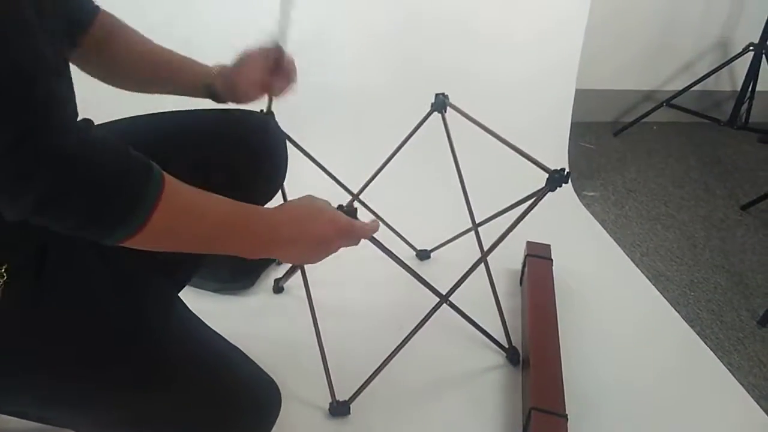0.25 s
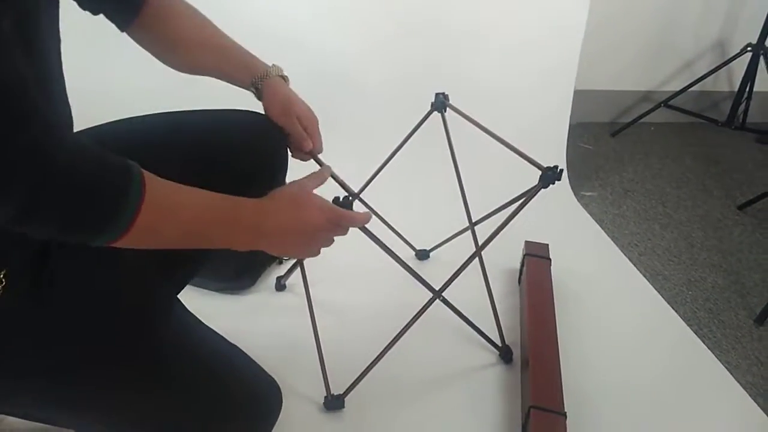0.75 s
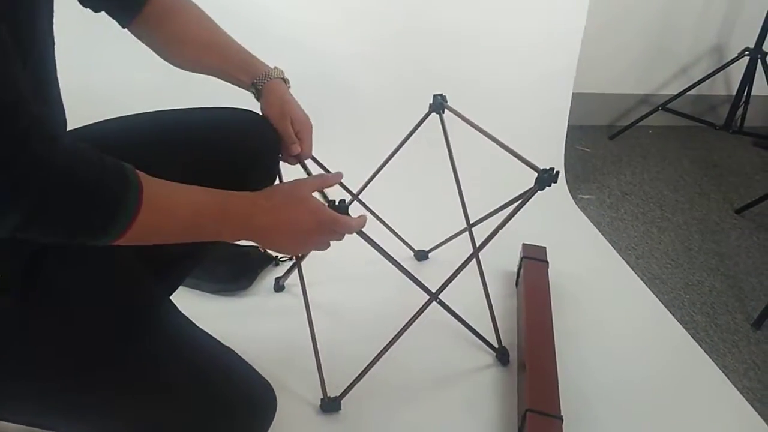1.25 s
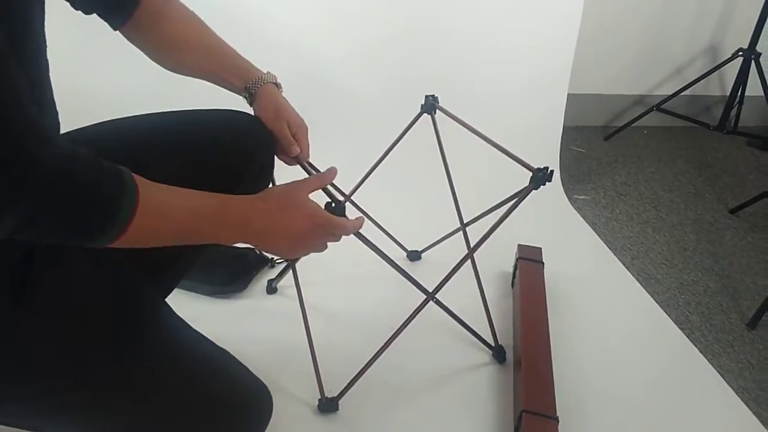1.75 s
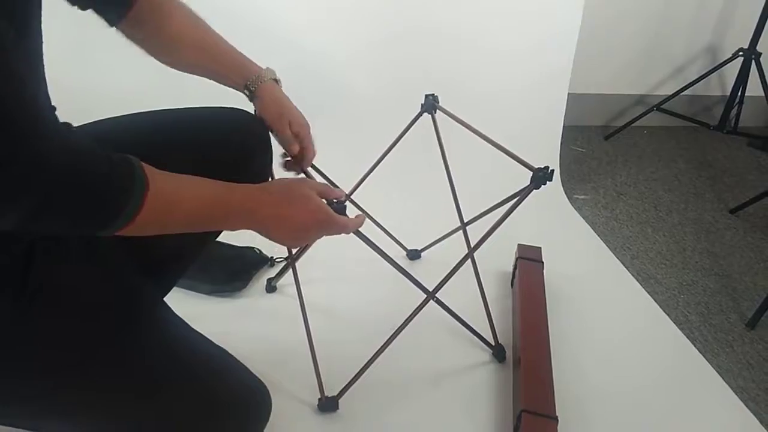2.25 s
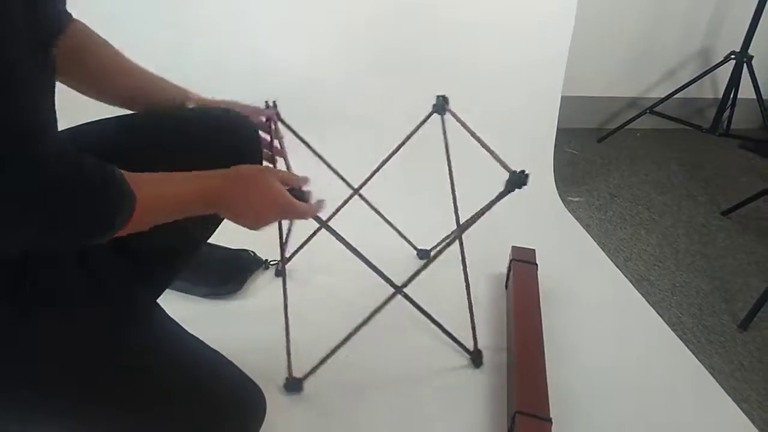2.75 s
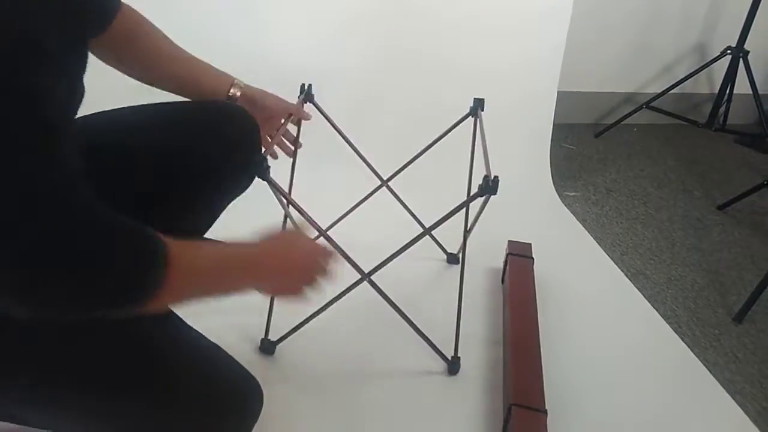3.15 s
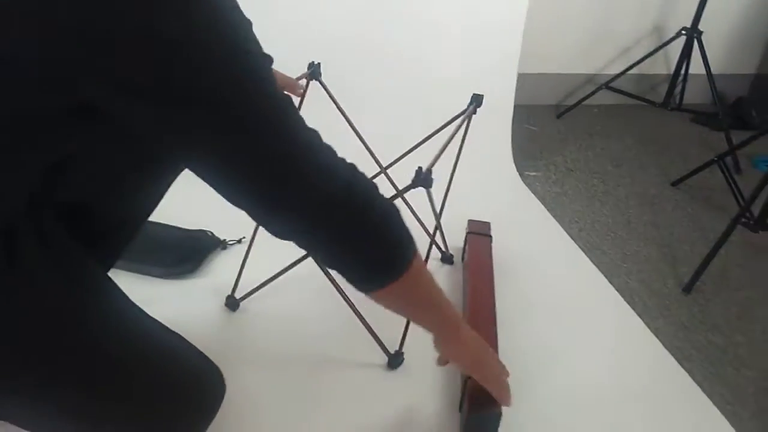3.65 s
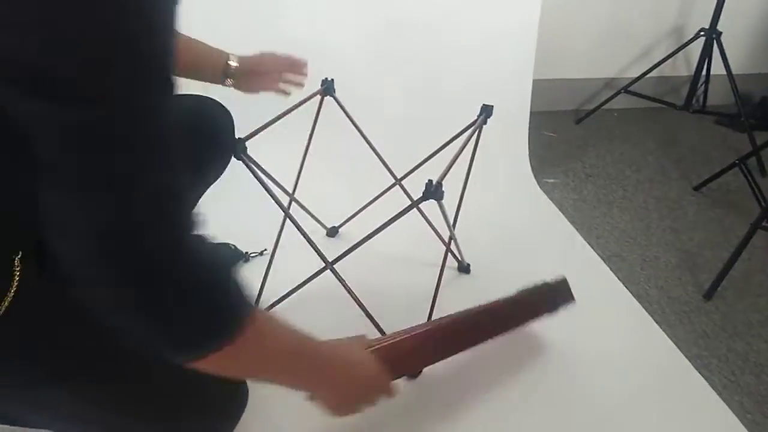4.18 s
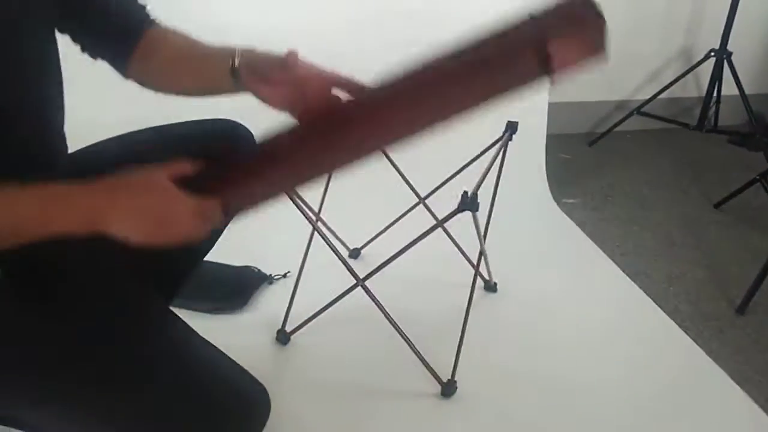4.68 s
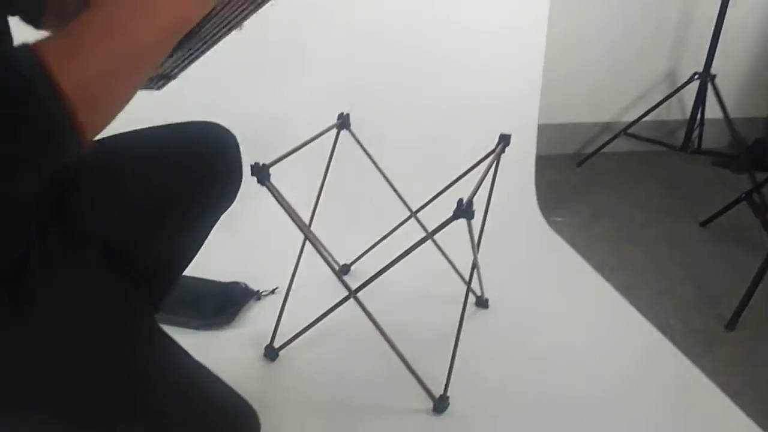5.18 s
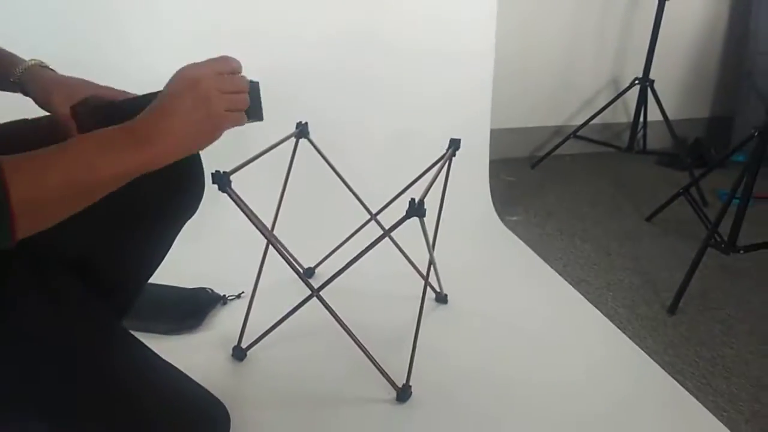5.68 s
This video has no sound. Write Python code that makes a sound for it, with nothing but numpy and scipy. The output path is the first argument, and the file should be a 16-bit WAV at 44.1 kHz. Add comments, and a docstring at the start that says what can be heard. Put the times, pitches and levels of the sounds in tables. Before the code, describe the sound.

A folding table frame is knocked together with dry clicks and a papery scrape, followed by a lifted slat bundle clattering sharply at the end.

```python
"""A small, bare studio with a paper backdrop: a folding camp table is set up before the microphone.
Aluminium poles click into plastic joints and seat with a duller blow: damped noise bursts, ringing modes.
A bundle of slats claps together as resonant bursts and chinks against a metal watch strap.
Feet slide on paper, a pole is eased home, the bundle squeaks, cloth and parts rub: filtered friction noise.
All of it feeds a diffuse room decay, over a steady background of low rumble and microphone hiss."""
import sys
import numpy as np
from scipy import signal
from scipy.fft import rfft, irfft
from scipy.io import wavfile

SR = 44100
rng = np.random.default_rng(int(sys.argv[2]) if len(sys.argv) > 2 else 0)


def dump_mix(stems):
    """Bounce the given channels to the path in sys.argv[1] as a 16-bit WAV at rate SR."""
    frames = np.atleast_2d(stems).T  # one column per channel
    limited = np.clip(frames, -1, 1)  # hard clip at full scale
    pcm = np.round(limited * 32767).astype(np.int16)
    wavfile.write(sys.argv[1], SR, pcm)


N = 261072
TIME = np.arange(N) / SR

# poles clicking into joints (levels before the body resonances):
# start_s [s], level_db [dB], hardness [0-1], thud_pitch_hz [Hz], seating_delay_s [s]
POLE_KNOCKS = [(0.0692, -24.5, 0.11, 271, .014), (.0722, -22.5, 0.48, 700, .021),
               (0.254, -42, 0.7, 300, .012), (0.6139, -33, 0.56, 860, .006), (.712, -48, 0, 646, .015),
               (1.161, -43, 0.28, 706, .011), (1.277, -42, 0.57, 745, .015),
               (1.390, -44.5, 0.63, 590, .021), (1.8492, -33, 0.63, 660, .008),
               (2.0141, -30.5, 0.81, 620, .015), (2.0283, -30, 0.07, 555, .009),
               (2.037, -38.5, 0.87, 530, .012), (2.592, -40.5, 0.4, 600, .028),
               (2.9428, -39.5, 0.86, 1130, .023), (2.967, -41.5, 0.59, 700, .012),
               (3.002, -37, 0.4, 850, .006), (3.2143, -28, 0.79, 358, .013)]
# resonances of the jointed frame: pitch_hz [Hz], width_hz [Hz], level_db [dB]
FRAME_RESONANCES = [(145, 40, 3), (240, 50, 6), (425, 30, -1), (520, 55, 6), (725, 30, 3), (870, 80, 3),
                    (1350, 200, -4), (2000, 300, -1), (3800, 1200, -4), (9900, 1500, -2)]
# touches on a loose pole end: start_s [s], level_db [dB]
LOOSE_POLE_TAPS = [(.073, -41), (.534, -58), (.546, -56.5), (1.850, -50)]
# ringing modes of a pole: pitch_hz [Hz], level_db [dB], t60_s [s]
POLE_MODES = [(2013, -13, .4), (3600, -17, .4), (7150, -9, .2), (7290, -9, .3), (9340, 0, .16),
              (9760, -6, .25), (11700, -2, .27), (11970, -9, .26), (14280, -7, .26)]
# the seating blow is weaker and softer than the click
SEAT_LOSS_DB, SEAT_HARDNESS_SHARE = 4.5, 0.64


def frame():
    """Poles click into plastic joints, seat with a softer blow, and ring while an end is still free."""
    contacts = []
    for start_s, level_db, hardness, thud_hz, delay_s in POLE_KNOCKS:
        click = (start_s, level_db, hardness, thud_hz)
        seating = (start_s + delay_s, level_db - SEAT_LOSS_DB, hardness * SEAT_HARDNESS_SHARE, thud_hz)
        contacts += [click, seating]
    knocks = blows(contacts, clack_hz=1184, snap_hz=4250, clack_t60=0.11, thud_t60=0.048, snap_t60=0.053)
    body = from_db(-4) * knocks + from_db(-3) * resonate(knocks, FRAME_RESONANCES)
    ringing = struck(LOOSE_POLE_TAPS, POLE_MODES, rebound_db=-18, tick_db=10)
    return body + ringing


# slats knocking in their bundle, plus one hard contact of the watch strap at 4.668 s (levels before the body):
# # start_s [s], level_db [dB], hardness [0-1], thud_pitch_hz [Hz]
BUNDLE_KNOCKS = [(3.778, -36, 0.1, 905), (3.789, -32.5, 0.28, 970), (4.2445, -33.5, 0.2, 1240),
                 (4.282, -37.5, .3, 1380), (4.336, -38.5, 0, 453), (4.603, -38.5, 0.26, 258),
                 (4.668, -38, 0.89, 496), (5.240, -38, 0.29, 490), (5.701, -38.5, 0.2, 630),
                 (5.7535, -25.5, 0.27, 1250), (5.7644, -21, 0.47, 510), (5.7835, -18, .58, 1200),
                 (5.8305, -22, 1, 410), (5.8354, -13, 0.92, 1010), (5.875, -31, 0.84, 705)]
# resonances of the bundle: pitch_hz [Hz], width_hz [Hz], level_db [dB]
BUNDLE_RESONANCES = [(298, 6.7, 7), (473, 10, 8), (4110, 1540, 2), (6300, 720, 0.5)]


def slats():
    """Hollow slats clap against each other; each blow also excites the bundle's resonances."""
    knocks = blows(BUNDLE_KNOCKS, clack_hz=1500, snap_hz=4570,
                   clack_t60=0.05, thud_t60=0.071, snap_t60=0.029)
    return from_db(-4.0) * (knocks + resonate(knocks, BUNDLE_RESONANCES))


# chinks of the watch strap: start_s [s], level_db [dB]
STRAP_CHINKS = [(4.524, -45), (4.630, -33), (4.682, -34), (4.780, -29.5), (4.801, -20), (4.823, -29.5),
                (4.830, -53), (4.841, -31)]
# ringing modes of its metal links: pitch_hz [Hz], level_db [dB], t60_s [s]
LINK_MODES = [(2830, -17, .05), (2930, -27, .45), (7240, -15, .06), (7315, -23, .33), (10440, -7, .06),
              (10558, -15, .36), (10610, -1, .06), (10800, -20, .3), (12650, -24, .14), (14060, -20, .13),
              (14590, -21, .12)]


def watch_strap():
    """Metal links ring at fixed pitches after each chink and its rebound."""
    return struck(STRAP_CHINKS, LINK_MODES, rebound_db=-8, tick_db=-16)


# resonances of the pole's tube under friction: pitch_hz [Hz], width_hz [Hz], level_db [dB]
TUBE_RESONANCES = [(1787, 22, 0), (3531, 35, -11)]
# colour of the feet sliding on paper: pitch_hz [Hz], level_db [dB]
PAPER_COLOUR = [(400, -52), (1200, -10.5), (2200, -2.5), (4500, 0.5), (8000, 0), (10000, 7), (13200, 2.5),
                (15500, -9)]
# resonances of the squeak: pitch_hz [Hz], width_hz [Hz], level_db [dB]
SQUEAK_RESONANCES = [(2250, 380, -5.5), (3880, 240, 4), (4070, 140, -6)]
# drags of the bundle's end: peak_s [s], level_db [dB], rise_s [s], fall_s [s]
BUNDLE_DRAGS = [(3.912, -49.5, .018, .07), (3.98, -49.5, .04, .04)]
# a pole is eased into its socket; start of full pressure
EASE_S, EASE_DB, EASE_RISE_S, EASE_HOLD_S, EASE_FALL_S = .85, -66, .13, .14, .26
# the feet slide in one pull; start of full speed
SLIDE_S, SLIDE_DB, SLIDE_RISE_S, SLIDE_HOLD_S, SLIDE_FALL_S = 2.753, -42.5, 0.14, .22, 0.12


def scrapes():
    """Friction sings in a pole's tube, hisses under the feet, and squeaks as the bundle drags on the floor."""
    tube = rms_one(resonate(friction(800, grain=0.5, flutter_db=1.5), TUBE_RESONANCES))
    paper = coloured(friction(2600, grain=0.31, flutter_db=3), PAPER_COLOUR)
    squeak = rms_one(resonate(friction(250, grain=0.2, flutter_db=-1.0), SQUEAK_RESONANCES))
    easing = stroke(EASE_S, EASE_DB, EASE_RISE_S, EASE_FALL_S, EASE_HOLD_S)
    sliding = stroke(SLIDE_S, SLIDE_DB, SLIDE_RISE_S, SLIDE_FALL_S, SLIDE_HOLD_S)
    return easing * tube + sliding * paper + strokes(BUNDLE_DRAGS) * squeak


# dull rubbing and sliding of cloth, pole and slats: peak_s [s], level_db [dB], rise_s [s], fall_s [s]
DULL_RUBS = [(.1, -54, 0.78, 0.85), (2.02, -51, 0.087, 0.34), (3.0, -61, 0.59, 1.9),
             (4.09, -51.5, 0.37, .35), (4.37, -49, 0.12, 0.63), (4.92, -58.5, 0.13, .7),
             (5.85, -46, 0.19, .3)]
# bright swishes, scrapes and faint hiss: peak_s [s], level_db [dB], rise_s [s], fall_s [s]
BRIGHT_SWISHES = [(.25, -60.5, 0.27, 0.54), (.81, -66.5, 0.039, 0.23), (1.345, -56, 0.069, 0.056),
                  (1.77, -60.5, 0.055, 0.13), (2.03, -56, 0.048, 0.28), (3.56, -46.5, 0.29, 0.24),
                  (3.83, -52.5, 0.15, 0.43), (4.45, -53.5, 0.37, 0.79), (4.915, -43.5, 0.022, 0.042),
                  (5.25, -78.5, 0.82, 2.6)]
# colour of the dull rubbing: pitch_hz [Hz], level_db [dB]
DULL_COLOUR = [(50, -21), (130, -1.5), (230, 0.5), (600, -2.5), (1000, -5), (2500, -10), (4600, -18),
               (8000, -94)]
# colour of the bright swishing: pitch_hz [Hz], level_db [dB]
BRIGHT_COLOUR = [(400, -17), (1300, 2.5), (2200, 5), (4800, 6), (7000, 0), (10000, 8), (13000, 3),
                 (15500, -9.5)]
# the dull rubbing is lumpy: random level points per second, and their spread
LUMPS_PER_S, LUMP_DB = 26, 2


def rubbing():
    """Dull friction noise comes in lumps; bright friction noise swells and fades."""
    rub = coloured(friction(2500, grain=.4, flutter_db=1.5), DULL_COLOUR)
    swish = coloured(friction(2500, grain=.3, flutter_db=.7), BRIGHT_COLOUR)
    lumps = from_db(LUMP_DB * drift(LUMPS_PER_S))
    return strokes(DULL_RUBS) * lumps * rub + strokes(BRIGHT_SWISHES) * swish


# decay of the bare studio: pitch_hz [Hz], t60_s [s]
STUDIO_DECAY = [(150, 0.62), (600, 0.62), (2000, 0.66), (5000, 0.54), (10000, 0.55), (15000, 0.058)]


def studio(x, build_s):
    """Diffuse reflections build up, then die away band by band."""
    t = TIME[:SR]
    edges_hz = np.geomspace(70, 16000, 13)
    tail = np.zeros(len(t))
    for low, high in zip(edges_hz, edges_hz[1:]):
        t60 = at_hz(STUDIO_DECAY, np.sqrt(low * high))
        decay = np.exp(-np.log(1000) * t / t60)
        tail += band(rng.standard_normal(len(t)), [low, high], "band") * decay
    tail *= 1 - np.exp(-t / build_s)
    return signal.fftconvolve(x, tail / np.sqrt(np.sum(tail ** 2)))[:N]


# colour of the steady background noise: pitch_hz [Hz], level_db [dB]
BACKGROUND_COLOUR = [(25, -21), (45, -8), (80, 6), (140, -5), (280, -2), (1100, -8.5), (2000, -15),
                     (3700, -31), (5500, -49), (8000, -48), (9800, -24), (13200, -35), (15500, -62)]
BACKGROUND_DB = -60.5


def background():
    """Steady background noise: low rumble and microphone hiss."""
    return from_db(BACKGROUND_DB) * coloured(rng.standard_normal(N), BACKGROUND_COLOUR)


# a fully hard contact loses thud; a fully soft one loses clack, and even more snap
HARD_THUD_LOSS_DB, SOFT_CLACK_LOSS_DB, SOFT_SNAP_LOSS_DB = 12, 27, 32


def blows(rows, clack_hz, snap_hz, clack_t60, thud_t60, snap_t60):
    """Each blow excites dense, damped modes, brighter when harder; the thud swells later than the highs."""
    t = TIME[:SR // 4]
    out = np.zeros(N + len(t))
    for start_s, level_db, hardness, thud_hz in rows:
        hard = np.clip(hardness, 0, 1)
        clack_db = level_db - SOFT_CLACK_LOSS_DB * (1 - hard)
        thud_db = level_db - HARD_THUD_LOSS_DB * hard
        snap_db = level_db - SOFT_SNAP_LOSS_DB * (1 - hard)
        parts = [(clack_db, [clack_hz, snap_hz], clack_t60, .0005),
                 (thud_db, [thud_hz / 2, thud_hz * 1.61], thud_t60, .002),
                 (snap_db, [snap_hz, 13000], snap_t60, .0005)]
        at = round(start_s * SR)
        for db, edges_hz, t60, rise_s in parts:
            shape = np.exp(-np.log(1000) * t / t60) * (1 - np.exp(-t / rise_s))
            vibration = rms_one(band(burst(shape), edges_hz, "band", order=3))
            out[at:at + len(t)] += from_db(db) * vibration * np.sqrt(np.mean(shape ** 2))
    return out[:N]


def burst(shape):
    """Dense vibration under an envelope, about equally strong at every pitch."""
    spectrum = rfft(rng.standard_normal(len(shape)) * shape)
    return irfft(spectrum / np.abs(spectrum), len(shape)) * np.sqrt(shape)


def struck(taps, modes, rebound_db, tick_db):
    """Each tap and its rebound ring every mode at a strength of its own, with a short contact tick."""
    start_s, tap_db = np.transpose(taps)
    start_s = np.r_[start_s, start_s + rng.uniform(.003, .008, len(start_s))]
    tap_db = np.r_[tap_db, tap_db + rebound_db]
    at = np.round(start_s * SR).astype(int)
    out = np.zeros(N)
    chance = rng.standard_normal((len(at), len(modes)))
    for k, (hz, db, t60) in enumerate(modes):
        clicks = np.zeros(N)
        clicks[at] = from_db(tap_db + db + 2 * chance[:, k])
        r = np.exp(-np.log(1000) / (t60 * SR))
        w = 2 * np.pi * hz / SR
        out += signal.lfilter([0, np.sin(w)], [1, -2 * r * np.cos(w), r * r], clicks + 1e-18)
    contacts = np.zeros(N)
    contacts[at] = from_db(tap_db + tick_db)
    tick_envelope = signal.lfilter([1], [1, -np.exp(-1 / (0.006 * SR))], contacts)
    ticks = tick_envelope * rng.standard_normal(N)
    return out + band(ticks, 3200, "high")


def friction(slips_per_s, grain, flutter_db):
    """Rubbing: tiny slips of uneven size over a smooth hiss, under a wavering pressure."""
    sizes = from_db(4 * np.minimum(rng.exponential(1, N), 4)) * rng.choice([-1, 1], N)
    slips = rms_one(sizes * (rng.random(N) < slips_per_s / SR))
    pressure = from_db(flutter_db * drift(60))
    return (rng.standard_normal(N) + grain * slips) * pressure


# a stroke lies this far down one rise time before, or one fall time after, its full level
STROKE_DEPTH_DB, STROKE_ROUNDING = 29.5, 1.925


def stroke(peak_s, level_db, rise_s, fall_s, hold_s=0):
    """Gain of one rubbing movement: it swells along a rounded slope, holds and fades."""
    before = (peak_s - TIME) / rise_s
    after = (TIME - peak_s - hold_s) / fall_s
    away = np.maximum(0, np.maximum(before, after))
    return from_db(level_db - STROKE_DEPTH_DB * np.minimum(away, 10) ** STROKE_ROUNDING)


def strokes(rows):
    """Overlapping movements add in power."""
    return np.sqrt(sum(stroke(*row) ** 2 for row in rows))


def resonate(x, resonances):
    """Parallel resonances, each with its own gain at its peak."""
    out = np.zeros(N)
    for hz, width_hz, db in resonances:
        r = np.exp(-np.pi * width_hz / SR)
        zeros = np.array([1, 0, -1]) * (1 - r * r) / 2
        poles = [1, -2 * r * np.cos(2 * np.pi * hz / SR), r * r]
        out += from_db(db) * signal.lfilter(zeros, poles, x + 1e-18)
    return out


def coloured(x, spectrum):
    """Give a steady sound a spectrum; rms 1."""
    bins_hz = np.arange(N // 2 + 1) * SR / N
    return rms_one(irfft(rfft(x) * from_db(at_hz(spectrum, bins_hz)), N))


def band(x, hz, kind, order=2):
    """Causal Butterworth filter."""
    return signal.sosfilt(signal.butter(order, hz, kind, fs=SR, output="sos"), x + 1e-18)


def drift(rate):
    """Smooth chance with spread 1, from random points at this rate per second."""
    knots = rng.standard_normal(N // 20)
    return rms_one(np.interp(TIME * rate, np.arange(len(knots)), knots))


def at_hz(points, hz):
    """Read a table on a log-frequency axis."""
    known_hz, values = np.transpose(points)
    return np.interp(np.log(np.maximum(hz, 1)), np.log(known_hz), values)


def rms_one(x):
    """Scale to rms 1."""
    return x / np.sqrt(np.mean(x ** 2) + 1e-20)


def from_db(db):
    """Decibels to gain."""
    return 10 ** (np.asarray(db) / 20)


def scene():
    """Direct sound of every source at the microphone, plus the room's answer and a steady background."""
    poles, bundle, watch = frame(), slats(), watch_strap()
    soft = scrapes() + rubbing()
    # a smaller share sent to the room makes a source sound closer to the microphone
    sent = from_db(-6.5) * poles + from_db(-8) * bundle + from_db(-16.0) * watch + from_db(-14.5) * soft
    return (poles + bundle + watch + soft + studio(sent, build_s=0.0019) + background())[None]


CUTOFF_HZ = 15500


def record(dry):
    """After the microphone, a steep elliptic low-pass cuts the top."""
    return signal.sosfilt(signal.ellip(10, .3, 80, CUTOFF_HZ, fs=SR, output="sos"), dry)


dry = scene()
out = record(dry)
dump_mix(out)
```